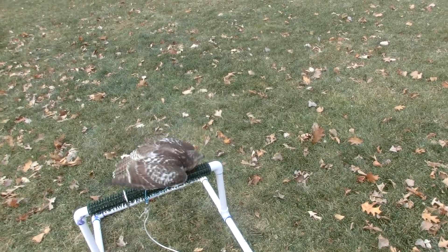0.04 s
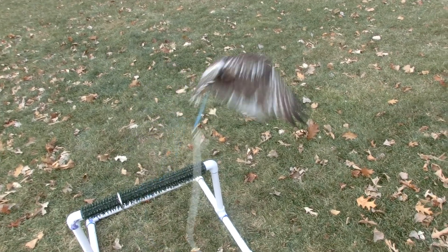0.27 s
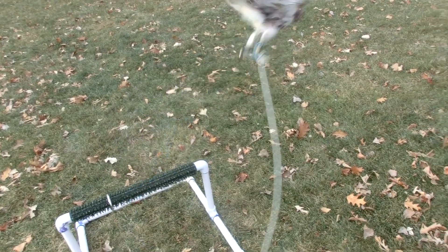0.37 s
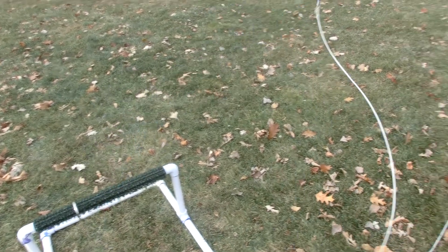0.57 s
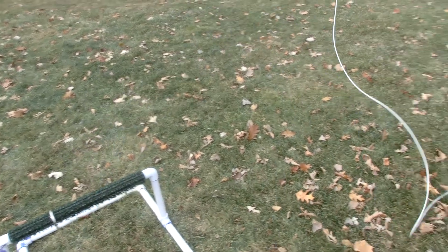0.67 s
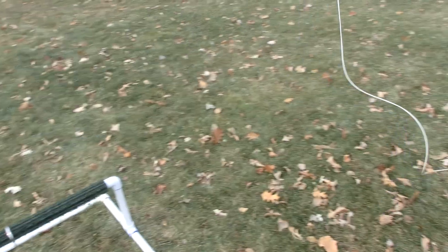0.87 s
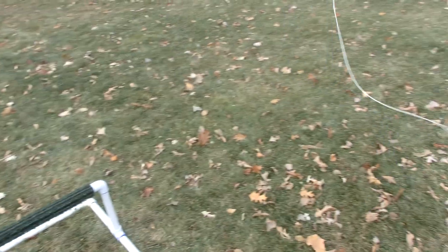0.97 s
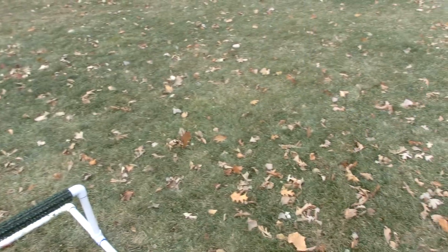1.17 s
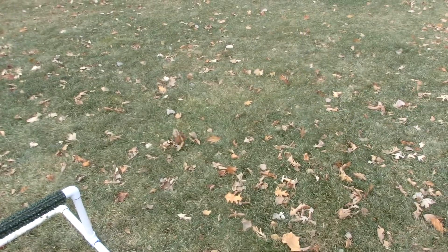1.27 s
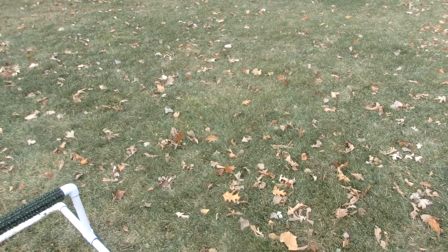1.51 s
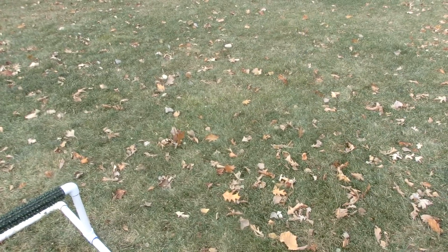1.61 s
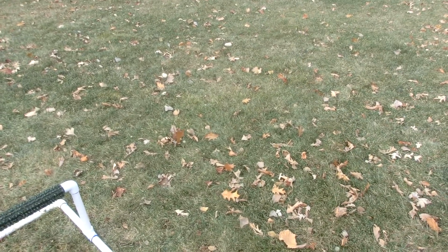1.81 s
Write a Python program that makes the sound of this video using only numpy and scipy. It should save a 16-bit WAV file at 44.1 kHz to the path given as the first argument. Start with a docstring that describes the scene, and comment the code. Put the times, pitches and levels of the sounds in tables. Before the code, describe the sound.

Small, high bells tinkle, then burst into a bright jingle as a bird flaps off its perch on a lawn. They grow fainter moving away from the microphone, over a softly rustling line and a low distant rumble.

```python
"""Two small slit bells on a hawk's legs, moving away from the microphone as the bird leaves its
perch and flies off low over a lawn. A loose pellet strikes and rattles inside each bell, and their
pitch sinks as the bird gathers speed. Its wings swish at take-off and its tether hisses and ticks
through the grass. Far behind lies an outdoor rumble with a faint hum."""
import sys
import numpy as np
from scipy import signal
from scipy.fft import rfft, irfft, next_fast_len
from scipy.io import wavfile
from scipy.ndimage import map_coordinates

SR = 44100
rng = np.random.default_rng(int(sys.argv[2]) if len(sys.argv) > 2 else 0)


def wav_out(sig):
    """Save sig, one row per channel (or a flat mono array), as 16-bit PCM at SR to the path in sys.argv[1]."""
    wavfile.write(sys.argv[1], SR, np.round(np.clip(np.atleast_2d(sig).T, -1, 1) * 32767).astype(np.int16))


N = 81585

# The bells at rest. Each row: mode in Hz, relative level in dB, seconds to ring down freely by 60 dB.
LOW_BELL_MODES = [(2681, 1, 0.12), (2490, -12.5, 0.12), (5813, -11.5, .27), (6580, -13, 0.24),
                  (9980, -1, .14), (11940, -1, .13)]
HIGH_BELL_MODES = [(3592.7, 1, 0.2), (7482, -11, 0.18), (7746, -7, 0.13), (11696, 0.5, .12),
                   (13450, 1, 0.094)]
# Pellet blows. Each row: start in seconds, relative level in dB, relative lift of upper modes in dB.
LOW_STRIKES = [(0.0004, -33, 1), (0.0396, -32, -18), (0.077, -35, -8), (0.127, -39.5, -16), (0.256, -22, 2),
               (0.2615, -18.5, -8), (0.3594, -19.5, 3.5), (0.3827, -11, -16.5), (0.4148, -18.5, -15),
               (0.5444, -27, -10), (0.6661, -19.5, -28), (0.6762, -18.5, -21), (1.1397, -16.5, -14.5),
               (1.2206, -17, -22), (1.3529, -22, -11), (1.5136, -31, -3.5), (1.6085, -23, -15.5)]
HIGH_STRIKES = [(0.2548, -22, -2.3), (0.3184, -36, -1.7), (0.3441, -20.5, -3), (0.4174, -30.5, -2),
                (0.4723, -28.5, -1), (0.7382, -49, -2), (0.9368, -37, -0.24), (0.9847, -32, -2),
                (1.1, -33.5, -2.5), (1.7719, -32.5, -2.9)]
# Shakes that set the pellet rolling. Each row: middle and half length in seconds, relative levels
# of the lower and of the upper modes in dB.
LOW_SHAKES = [(0.194, 0.019, -39.5, -40), (0.27, 0.013, -25.5, -33), (.32, 0.022, -38.5, -31.5),
              (0.358, 0.015, -32, -43), (0.45, 0.018, -32.5, -32.5), (0.509, 0.0096, -32.5, -52),
              (0.518, 0.0055, -38, -39), (0.542, 0.0062, -26, -37.5), (0.621, 0.029, -35.5, -37),
              (0.682, 0.0043, -23, -25.5), (0.713, 0.0049, -27.5, -35), (0.762, 0.017, -38, -41.5),
              (0.815, 0.014, -50, -54), (1.085, 0.012, -42, -47), (1.161, 0.013, -36, -30),
              (1.224, 0.037, -36, -34.5), (1.284, 0.0067, -30.5, -43.5), (1.351, 0.011, -43, -41.5),
              (1.444, 0.011, -42, -37.5), (1.53, 0.036, -51, -50), (1.579, 0.0089, -39, -44),
              (1.662, 0.036, -43, -43), (1.751, 0.013, -42.5, -38.5), (1.793, 0.041, -39, -46)]
HIGH_SHAKES = [(.22, 0.019, -42, -29.5), (.27, 0.0045, -54, -20), (.3, 0.021, -54, -39),
               (0.343, 0.018, -25.5, -27), (0.391, .012, -29, -21.5), (0.432, 0.015, -37, -20),
               (.5, 0.015, -43, -32.5), (.685, 0.012, -48, -36.5), (0.743, .017, -40.5, -35),
               (.808, 0.021, -56, -37), (.86, 0.018, -44.5, -41.5), (1.003, 0.027, -35.5, -52),
               (1.049, 0.029, -48, -37), (1.114, 0.028, -46, -38), (1.178, 0.035, -41.5, -35.5),
               (1.245, 0.022, -52, -37), (1.433, 0.019, -45, -35.5), (1.525, 0.0078, -52, -47),
               (1.585, 0.017, -41.5, -40.5), (1.639, 0.013, -47, -43.5), (1.735, 0.014, -57, -39.5),
               (1.8, 0.026, -39.5, -43)]
# Single modes singing out. Each row: start in seconds, pitch at rest in Hz, hold in seconds,
# relative level in dB.
PINGS = [(.002, 6466, 0.044, -45.5), (.07, 6529, 0.09, -55), (.034, 11940, 0.0045, -36),
         (.252, 3584, 0.0067, -21.5), (.256, 9990, 0.009, -22), (.264, 11650, 0.0087, -18),
         (.276, 7760, 0.032, -29), (.287, 5950, .012, -51), (.318, 7550, 0.032, -24),
         (.323, 11680, 0.0037, -15), (.374, 11700, 0.0028, -24), (.417, 13350, 0.0034, -16),
         (.423, 11830, 0.0034, -12), (.49, 13440, 0.018, -31.5), (.526, 10020, 0.0057, -22),
         (.553, 11940, 0.011, -24.5), (.617, 5760, 0.043, -42.5), (.676, 6529, 0.0093, -39),
         (.691, 9960, 0.0025, -18), (.718, 10130, .004, -24.5), (.745, 13440, 0.03, -30),
         (.825, 11700, 0.052, -40.5), (1.001, 7485, 0.029, -47), (1.04, 11740, 0.021, -30.5),
         (1.085, 7485, 0.082, -45), (1.093, 13440, 0.029, -27), (1.1, 3584, 0.12, -41),
         (1.148, 9960, .03, -33.5), (1.176, 11600, .009, -25.5), (1.177, 13440, .008, -24),
         (1.21, 13440, 0.082, -36.5), (1.245, 10080, .012, -35.5), (1.356, 11960, 0.025, -29),
         (1.375, 6540, .04, -47), (1.44, 9940, 0.035, -44), (1.57, 6560, 0.028, -43),
         (1.63, 10000, 0.016, -38), (1.742, 11940, 0.01, -53), (1.772, 10020, .02, -41)]
# Dry clicks of the bells and, later, the tether. Each row: start in seconds, level in dB.
DRY_CLICKS = [(0.2553, -26), (.384, -33), (0.419, -20), (0.424, -29), (0.5436, -22), (.611, -32.5),
              (0.687, -33), (.921, -37), (1.0, -43), (1.025, -32), (1.094, -31), (1.715, -38.5)]
# The hawk's flight. Each row: time in seconds, speed away from the microphone in m/s.
FLIGHT_SPEED = [(0, 1), (.2, -1.5), (.35, 0.73), (.48, 3), (.63, 4), (.8, 4.5), (1.2, 6), (1.5, 5.5),
                (1.8, 3)]
# Wing strokes. Each row: middle and half length in seconds, relative level in dB.
WINGBEATS = [(0.226, 0.023, -33), (0.265, 0.009, -31.5), (0.378, 0.017, -31), (0.435, 0.021, -32.5),
             (0.551, 0.017, -36), (0.73, 0.041, -44.5)]
# The tether's hiss. Each row: time in seconds, level in dB.
TETHER_LEVEL = [(0, -74), (.16, -58), (.21, -37.5), (.45, -41.5), (.6, -42.5), (.85, -49.5), (1.02, -46.5),
                (1.1, -42), (1.27, -46), (1.32, -46), (1.44, -48), (1.7, -56.5), (1.85, -53)]
# Noise colours of hard contact, feathers, grass and rumble.
# Each row: frequency in Hz, relative level in dB.
CONTACT_SPECTRUM = [(300, -20), (1500, -16), (2700, 2), (4500, -5), (8300, -4.5), (9400, 4.5),
                    (10600, -1.5), (11700, -1), (12600, 2), (15500, -10)]
FEATHER_SPECTRUM = [(150, -0.5), (400, -2.5), (1200, -3), (2200, -3.5), (4500, -7.5), (8000, 1),
                    (12000, 5.5), (15500, -2.5)]
GRASS_SPECTRUM = [(1000, 5.5), (3000, 1), (5000, -0.5), (9000, 3.5), (12000, 3.5), (15500, -3)]
RUMBLE_SPECTRUM = [(20, -2.5), (40, -7.5), (60, 2.5), (95, -3), (125, -3.5), (160, -10.5), (210, -9.5),
                   (300, -22), (430, -25), (750, -19.5), (1000, -25), (1500, -30.5), (2500, -31),
                   (5000, -41), (15000, -36)]
# The rumble's stereo image. Each row: frequency in Hz, left-right likeness (1 is mono).
RUMBLE_LIKENESS = [(100, 1), (200, 1), (350, 0.86), (700, 1), (1400, 0.87), (5000, .4)]

UPPER_MODES_HZ, ATTACK_S, CONTACT_T60_S = 5000, 0.0009, 0.023
TICKS_PER_S, TICK_SPREAD_DB, ROLL_PER_S = 300, 5, 45
PING_RISE_S, PING_T60_S, PING_WAVER = 0.001, 0.048, 0.0017
SNAGS_PER_S, SNAG_T60_S, SNAG_DB = 260, 0.0061, 6
SOUND_M_PER_S, TOP_HZ = 343, 15900
LEFT_RIGHT = np.array([[1], [-1]])


def bell(modes, hits, scatter_db, detune, damping, contact_db):
    """Each hit rings the shell's modes, Doppler-shifted, with a short burst of contact noise."""
    hz, mode_db, t60 = np.transpose(modes)
    t = np.arange(SR // 5) / SR
    envelope = amp(-60 * damping * t / t60[:, None]) * (1 - np.exp(-t / ATTACK_S))
    burst_power = amp(-60 * t / CONTACT_T60_S) ** 2
    # The rolling pellet favours now one overtone, now another.
    favour = np.array([wobble(ROLL_PER_S) for _ in hz])
    ringing, contact_power = np.zeros((2, N)), np.zeros(N)
    for s, level_db, bright_db in hits:
        weight, phase, pan = rng.standard_normal((3, len(hz)))
        sag = detune * weight ** 2 * hz.min() / hz  # the pellet's weight pulls the pitch down
        pitch = hz * doppler(s) * (1 - sag)
        lift_db = bright_db + scatter_db * favour[:, min(int(s * SR), N - 1)]
        gain = amp(level_db + mode_db + (hz > UPPER_MODES_HZ) * lift_db)
        pan_db = LEFT_RIGHT * (0.5 + 2 * pan) * hz / hz.max()
        partials = envelope * np.sin(2 * np.pi * pitch[:, None] * t + np.pi * phase[:, None])
        add(ringing, s, (gain * amp(pan_db)) @ partials)
        add(contact_power, s, np.sum(gain ** 2) * burst_power)
    contact = np.sqrt(contact_power) * noise(CONTACT_SPECTRUM, likeness=[(3000, 0.25)])
    return ringing + amp(contact_db) * contact


def strikes(modes, blows, gain_db, bright_db):
    """Hard blows of the pellet, after which the shell rings freely."""
    hits = np.array(blows) + [0, gain_db, bright_db]
    return bell(modes, hits, scatter_db=5.5, detune=0.0022, damping=1, contact_db=-10)


def rattle(modes, shakes, gain_db, bright_db, detune, damping):
    """The shaken pellet tumbles round the shell: swells of light, uneven ticks that load and damp it."""
    count = int(TICKS_PER_S * N / SR)
    jitter, size = rng.standard_normal((count, 2)).T
    starts = np.abs(np.arange(count) + jitter / 2) / TICKS_PER_S
    middle, half, *shake_db = np.transpose(shakes)
    swells = np.exp(-((starts[:, None] - middle) / half) ** 2 / 2)
    lower_db, upper_db = 20 * np.log10(amp(shake_db) @ swells.T + amp(-59))
    tick_db = lower_db + gain_db + TICK_SPREAD_DB * np.tanh(size)
    hits = np.transpose([starts, tick_db, upper_db - lower_db + bright_db])
    return bell(modes, hits, scatter_db=4, detune=detune, damping=damping, contact_db=-10)


def pings(gain_db, spread_db):
    """The pellet chatters on one mode, which swells, holds with a slight waver and dies away."""
    out, t = np.zeros((2, N)), np.arange(SR // 6) / SR
    for (s, hz, hold, db), (pan, lag) in zip(PINGS, rng.standard_normal((len(PINGS), 2))):
        decay_db = 60 * np.maximum(t - hold, 0) / PING_T60_S
        envelope = amp(db + gain_db - decay_db) * (1 - np.exp(-t / PING_RISE_S))
        pitch = hz * doppler(s) * (1 + PING_WAVER * wobble(340)[:len(t)])
        phase = 2 * np.pi * np.cumsum(pitch) / SR
        width = LEFT_RIGHT * hz / 12000  # higher pings sit wider
        add(out, s, envelope * amp(width * (1 + spread_db * pan)) * np.sin(phase + 0.52 * lag * width))
    return out


def doppler(s):
    """Pitch factor at the microphone at time s: below 1 while the bird draws away."""
    return 1 / (1 + np.interp(s, *np.transpose(FLIGHT_SPEED)) / SOUND_M_PER_S)


def dry_clicks(t60_s):
    """The bells knock together early on, then the tether ticks against grass and leaves."""
    envelope, t = np.zeros(N), np.arange(SR // 10) / SR
    for s, db in DRY_CLICKS:
        add(envelope, s, amp(db - 60 * t / t60_s))
    return envelope * noise(CONTACT_SPECTRUM, likeness=[(3000, 0.59)])


def wings():
    """Each beat is a fluttering swish of feathers."""
    t = np.arange(N) / SR
    beats = sum(amp(db) * np.exp(-((t - s) / half) ** 2 / 2) for s, half, db in WINGBEATS)
    flutter = amp(2 + 3.3 * wobble(220))
    return beats * flutter * noise(FEATHER_SPECTRUM, likeness=[(500, 0.48), (8000, 0.91)])


def tether():
    """At ground level the line runs out, hissing and flicking grass blades and dry leaves."""
    level_db = np.interp(np.arange(N) / SR, *np.transpose(TETHER_LEVEL))
    when, size = rng.random((int(SNAGS_PER_S * N / SR), 2)).T
    flicks = np.bincount((when * N).astype(int), size ** 3, N)
    power_decay = amp(-120 * np.arange(SR // 20) / SR / SNAG_T60_S)
    snag_power = np.abs(signal.fftconvolve(flicks, power_decay)[:N])
    roughness = np.sqrt(1 + amp(SNAG_DB) ** 2 * snag_power) * amp(wobble(200))
    return amp(level_db) * unit_rms(roughness * noise(GRASS_SPECTRUM, likeness=[(3000, 0.41)]))


def distant_rumble():
    """Far beyond the lawn: a low rumble with a faint, wandering hum."""
    hum_db = -49.5 + 6.8 * wobble(3.48)
    hum_hz = 123 + 3 * wobble(8.06)
    hum = amp(hum_db) * np.sin(2 * np.pi * np.cumsum(hum_hz) / SR)
    return amp(-39.5 + 0.4 * wobble(4.85)) * noise(RUMBLE_SPECTRUM, RUMBLE_LIKENESS) + hum


def amp(db):
    return 10 ** (np.asarray(db) / 20)


def unit_rms(x):
    return x / np.sqrt(np.mean(x ** 2) + 1e-20)


def along(points, hz):
    """Interpolate (Hz, value) points on a log frequency axis."""
    knots_hz, values = np.transpose(points)
    return np.interp(np.log(hz + 1), np.log(knots_hz + 1), values)


def wobble(per_s):
    """A smooth random curve with per_s knots a second."""
    return map_coordinates(rng.standard_normal(int(N * per_s / SR) + 4), [np.arange(N) * per_s / SR])


def filtered(x, response):
    """Shape x by a gain given as a function of Hz."""
    size = next_fast_len(N + SR // 2)
    return irfft(rfft(x, size) * response(np.fft.rfftfreq(size, 1 / SR)), size)[..., :N]


def noise(spectrum, likeness):
    """Coloured stereo noise of rms 1; likeness holds (Hz, left-right correlation) points."""
    def mid_side_gains(hz):
        angle = np.arccos(np.clip(along(likeness, hz), -1, 1)) / 2
        return amp(along(spectrum, hz)) * [np.cos(angle), np.sin(angle)]
    mid, side = filtered(rng.standard_normal((2, N)), mid_side_gains)
    return unit_rms(np.array([mid + side, mid - side]))


def add(track, s, sound):
    """Mix a sound into the track at time s."""
    start = int(np.clip(round(s * SR), 0, N - 1))
    track[..., start:start + sound.shape[-1]] += sound[..., :N - start]


def scene():
    """From the lawn: bells in front, wings and tether under them, the rumble far off."""
    low = strikes(LOW_BELL_MODES, LOW_STRIKES, gain_db=-3.5, bright_db=-2)
    low += rattle(LOW_BELL_MODES, LOW_SHAKES, gain_db=-1, bright_db=-4.5, detune=0.0162, damping=1.69)
    high = strikes(HIGH_BELL_MODES, HIGH_STRIKES, gain_db=-3.5, bright_db=1)
    high += rattle(HIGH_BELL_MODES, HIGH_SHAKES, gain_db=-4, bright_db=-1, detune=0.00196, damping=1.75)
    bells = low + high + pings(gain_db=1.5, spread_db=0.5)
    return bells + dry_clicks(t60_s=0.027) + wings() + tether() + distant_rumble()


def record(dry):
    """The microphone chain passes nothing above its band limit."""
    return filtered(dry, lambda hz: hz < TOP_HZ)


dry = scene()
out = record(dry)
wav_out(out)
```